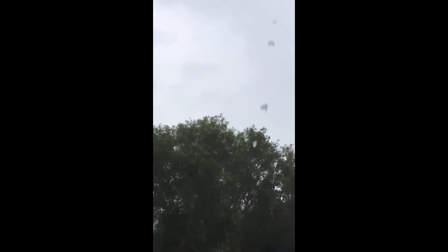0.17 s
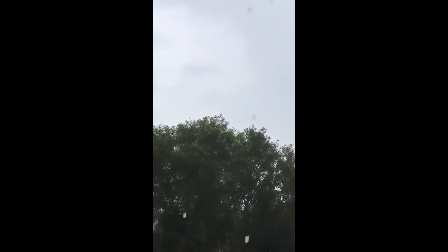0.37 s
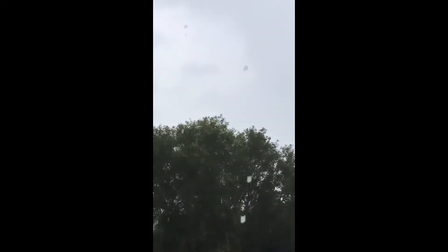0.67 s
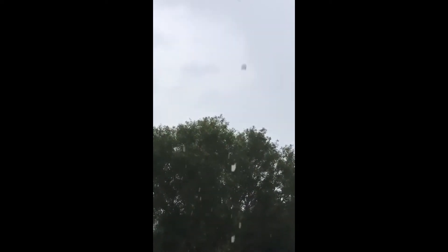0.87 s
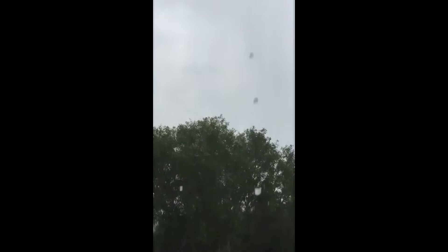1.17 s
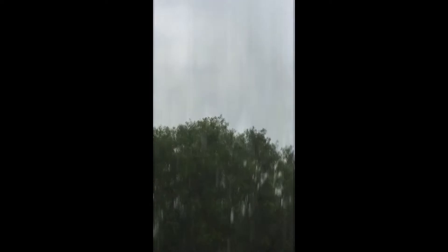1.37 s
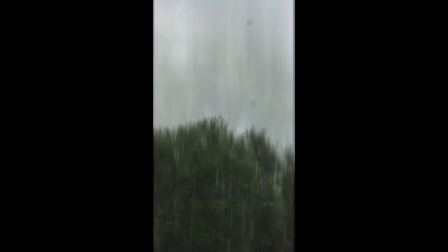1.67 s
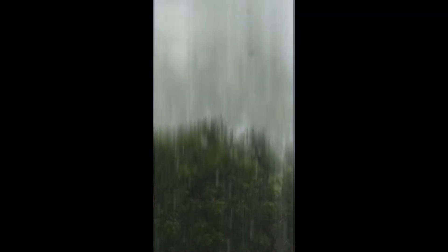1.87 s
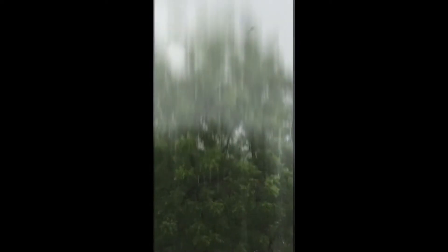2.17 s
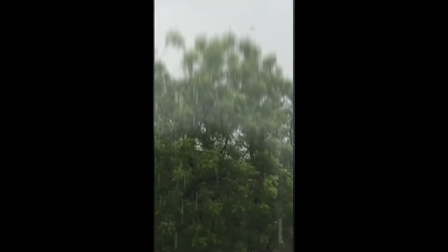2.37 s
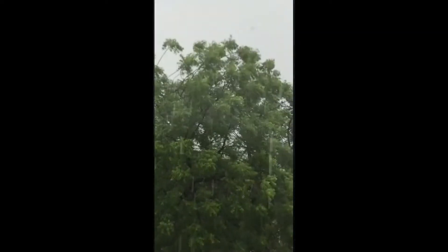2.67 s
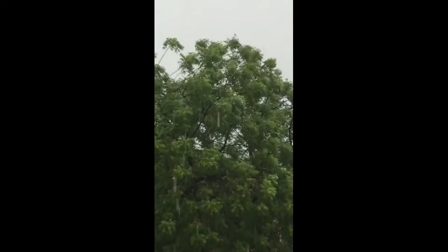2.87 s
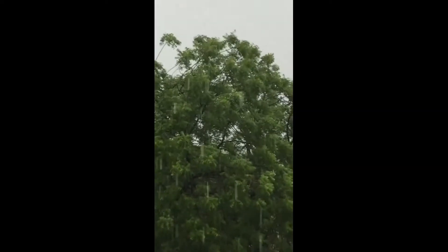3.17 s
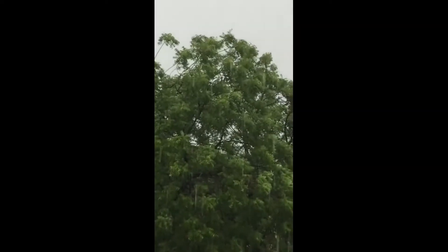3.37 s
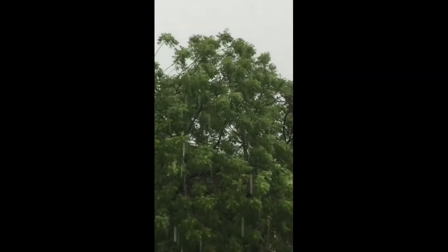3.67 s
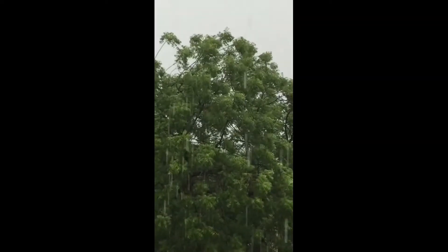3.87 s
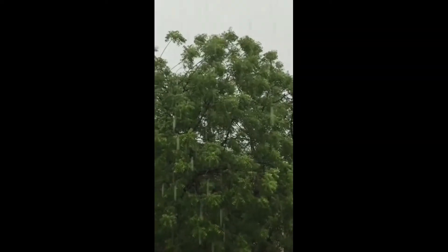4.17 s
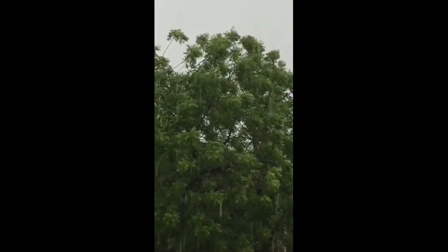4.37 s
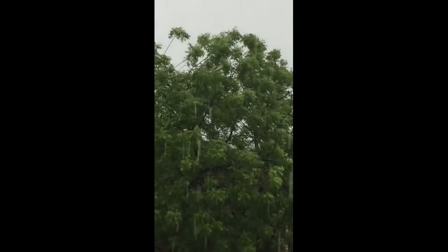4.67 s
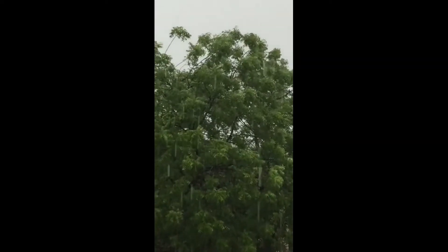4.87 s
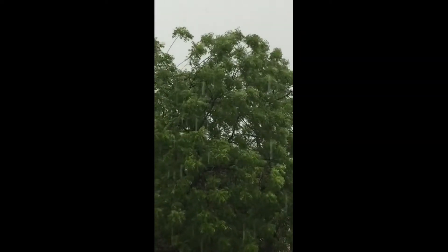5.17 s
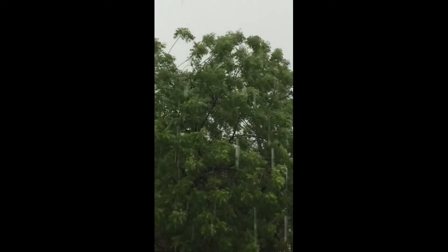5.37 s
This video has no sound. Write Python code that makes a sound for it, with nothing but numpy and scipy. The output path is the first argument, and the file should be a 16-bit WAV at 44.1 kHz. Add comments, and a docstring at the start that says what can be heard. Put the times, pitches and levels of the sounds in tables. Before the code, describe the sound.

Outdoors among trees, a dense hiss of heavy rain carries the patter of drops on leaves, small puddle plinks and a low drumming on a slack cover. It fades, cuts out completely for a split second, and builds again. From about halfway it stays louder and brighter, with large drops splatting irregularly right beside the microphone.

```python
"""Heavy rain on trees and ground.

Countless far drops merge into a wash, nearer ones patter on leaves, and big ones smack down close by,
each trailed by its spray. Drops ring a slack cover; bubbles plink in puddles. The sound sinks, drops
out for 0.3 s and swells back louder and brighter; now and then it dips for an instant. Mono."""
import sys
import numpy as np
from scipy import signal
from scipy.fft import rfft, irfft, next_fast_len
from scipy.io import wavfile
from scipy.ndimage import uniform_filter1d

SR = 44100
rng = np.random.default_rng(int(sys.argv[2]) if len(sys.argv) > 2 else 0)


def unload_audio(sound):
    """Save the sound as a 16-bit wav file, at the path given as the first command line argument."""
    columns = np.transpose(np.atleast_2d(sound))
    # keep every value between -1 and 1, then stretch to whole-number steps
    steps = np.round(np.clip(columns, -1, 1) * 32767)
    wavfile.write(sys.argv[1], SR, steps.astype(np.int16))


N = 243873
TIME = np.arange(N) / SR
TOP_HZ = 15750


def wash(flow_db, drum_db, splash_db, hiss_db, flicker_db, splash_follows):
    """Far rain: drumming, splashing on wet ground and hiss from leaves, each flickering on its own."""
    # band spectra: f/Hz, relative density/dB
    drumming = [(15, -44.5), (30, -52.5), (64, -35.5), (115, -17), (170, -6), (230, -4.5), (270, -5),
                (315, -6.5), (410, -5.5), (500, -9), (610, -9), (850, -22.5), (2000, -35.5)]
    splashing = [(200, -39.5), (480, -16.5), (600, -7), (740, -5.5), (880, -8.5), (1120, -4.5), (1480, -5),
                 (1950, -6), (2500, -9), (3500, -10), (9000, -53)]
    hiss = [(500, -51), (1500, -15.5), (2400, 1), (3200, 1), (4300, 3.5), (5400, 4), (6700, 3.5),
            (7500, 0.5), (8600, 0.5), (12000, -5), (15500, -4.5)]
    out = np.zeros(N)
    for spectrum, level_db, wobble_db in (
            (drumming, drum_db + flow_db, 0.47 * walk(24)),
            (splashing, splash_db + splash_follows * flow_db, 0.45 * walk(25.05)),
            (hiss, hiss_db + flow_db, flicker_db * walk(40))):
        out += unit(colour(rng.standard_normal(N), spectrum)) * undb(level_db + wobble_db)
    return out


def close_drops():
    """Big drops land close by, each with a sizzle of spray."""
    # drops: t/s, smack level over 1 ms/dB, f/Hz, half-width/oct, spray re smack/dB, smack length/s
    drops = [(0.0236, -24.5, 8400, 1.1, 4, 0.0003), (0.1378, -28, 3640, 0.39, 1, 0.0003),
             (0.3312, -24.5, 8680, 1.1, 1, 0.0004), (0.4127, -27, 4600, 0.26, -2, 0.00064),
             (0.4863, -22.5, 4200, 1.3, 6.5, 0.00037), (0.585, -31, 5530, 1.1, 9.5, 0.00034),
             (0.6409, -31, 4200, 0.8, -9, 0.0003), (0.666, -20.5, 5600, 0.79, 1, 0.00075),
             (0.7355, -25.5, 4520, 0.77, 1.0, 0.0003), (0.7684, -28.0, 6490, 0.64, 4, 0.00027),
             (0.8, -32.5, 9560, 0.32, 10, 0.0003), (1.0101, -29, 4220, 0.52, 7, 0.0003),
             (1.183, -29.5, 4520, 0.67, 6, 0.0003), (1.205, -28.5, 5200, 0.94, 9, 0.0003),
             (1.3342, -30.5, 8100, 1.0, 9, 0.0003), (1.452, -29, 1890, 0.39, 4, 0.001),
             (1.752, -32, 5850, 0.98, -4, 0.0003), (2.1466, -33, 4450, 1.0, 6.5, 0.00027),
             (2.1695, -31, 4930, 1.0, 7.5, 0.00027), (2.371, -32, 1380, 0.52, 10, 0.001),
             (2.418, -35, 12000, 0.35, 6, 0.0003), (2.6171, -28.5, 12000, 1.5, 9, 0.0003),
             (2.6542, -27, 12000, 1.1, 6.0, 0.0004), (2.684, -28, 3570, 1.0, -10, 0.00043),
             (2.7856, -18, 5500, 0.52, -3, 0.0003), (2.836, -22.5, 4250, 1.0, 3.5, 0.00023),
             (2.9067, -11.5, 11300, 1.2, -3.5, 0.00039), (2.9635, -17, 7900, 0.36, -3, 0.00037),
             (2.9957, -11.5, 5250, 0.73, -1, 0.00011), (3.0667, -14.5, 7100, 0.77, -3, 0.00032),
             (3.1357, -16.5, 11000, 1.9, 1, 0.00055), (3.2095, -21.5, 5530, 0.65, -4, 0.0002),
             (3.3008, -27, 11830, 1.0, -3, 0.00034), (3.4, -25, 3850, 0.67, 7.5, 0.00024),
             (3.4538, -17.5, 3730, 0.83, 1, 0.00094), (3.4766, -18.5, 3900, 0.37, -1, 0.00086),
             (3.5219, -23, 5650, 0.48, -2.5, 0.0003), (3.5943, -25.5, 8300, 1.3, 3.5, 0.00033),
             (3.6467, -23, 12000, 1.1, -4, 0.00037), (3.6997, -22, 4650, 0.6, 5, 0.00044),
             (3.7554, -16, 7260, 1.1, -0.5, 0.00023), (3.8455, -23.0, 4250, 1.1, 4, 0.00043),
             (3.8671, -15, 4250, 0.59, -9, 0.00072), (3.8768, -34, 12000, 1.0, 8, 0.0003),
             (3.8979, -23, 10470, 1.0, -3.5, 0.0003), (3.9092, -17.5, 4600, 0.81, 1, 0.0005),
             (3.9734, -27, 8470, 0.54, -10, 0.0003), (4.0885, -21.5, 6300, 0.83, 2, 0.00022),
             (4.1364, -24, 6240, 0.91, 1, 0.00024), (4.1519, -22.5, 3560, 1.0, 1, 0.0003),
             (4.1719, -21, 5300, 0.5, 2, 0.0004), (4.1964, -24.5, 8240, 0.8, 5, 0.00023),
             (4.4196, -20, 12000, 1.1, 0, 0.00027), (4.4705, -27, 6370, 0.9, 10, 0.0003),
             (4.5286, -21, 12000, 0.83, -4.5, 0.0003), (4.5527, -23, 6740, 0.64, -6.0, 0.0003),
             (4.6358, -18.5, 5050, 0.7, -2, 0.00027), (4.6653, -20.5, 7990, 0.61, 3, 0.0003),
             (4.683, -31.5, 4620, 0.42, 13.5, 0.00027), (4.7333, -19.5, 3430, 0.58, 5.5, 0.00064),
             (4.8485, -27, 10380, 0.35, 4, 0.00027), (4.8667, -16, 4100, 0.48, -2, 0.0005),
             (4.8873, -28, 12000, 0.5, 3.0, 0.0003), (4.9727, -29, 5550, 0.62, -4, 0.0003),
             (4.9928, -18, 4690, 0.63, -9, 0.00044), (4.9978, -16, 5690, 1, 0, 0.00024),
             (5.0483, -30, 3260, 0.8, -6.5, 0.00042), (5.0812, -22, 4710, 0.37, -5.0, 0.0004),
             (5.1042, -24.0, 6040, 0.57, -6, 0.00026), (5.1413, -32, 9430, 0.33, 10, 0.0003),
             (5.2004, -12, 10900, 1, 1.5, 0.00043), (5.2489, -12.5, 10190, 0.82, -7, 0.00023),
             (5.2908, -20.5, 5200, 0.37, 1, 0.0003), (5.3998, -10.5, 5600, 0.49, -3, 0.00048),
             (5.4099, -12.5, 4640, 0.69, -3, 0.00027), (5.416, -28, 13000, 0.29, 12, 0.00016),
             (5.502, -15, 3630, 0.53, 2.5, 0.00046)]
    return impacts(drops, spray_rise_s=0.0006, spray_decay_s=0.021, grain=0.66)


def patter(flow_db, near_db, centre_hz, spray_db, longest_s, count):
    """Drops hit leaves evenly over a ring around the listener: many far and faint, few near and strong."""
    moment, place, pitch, width, softness = rng.random((count, 5)).T
    t_s = moment * N / SR
    distance_ratio = np.sqrt(1 + 20 * place)
    level_db = np.interp(t_s, TIME, flow_db) + near_db - 20 * np.log10(distance_ratio)
    hz = centre_hz * 2 ** (2.1 * (pitch - .5))
    width_oct = 0.11 + 0.45 * width
    drops = np.column_stack([t_s, level_db, hz, width_oct, np.full(count, spray_db), longest_s * softness])
    return impacts(drops, spray_rise_s=0.001, spray_decay_s=0.025, grain=0.83)


def impacts(drops, spray_rise_s, spray_decay_s, grain):
    """Each drop smacks and flattens in a crackle; its droplets then land in a grainy sizzle."""
    size, lead = 4096, 128  # samples
    t_s, level_db, hz, width_oct, spray_db, length_s = np.asarray(drops, float).T[:, :, None]
    f = np.maximum(np.fft.rfftfreq(size, 1 / SR), 1)
    band = np.exp(-.5 * (np.abs(np.log2(f / hz)) / width_oct) ** 1.83)
    age_s = (np.arange(size) - lead) / SR
    noise, roughness = rng.standard_normal((len(t_s), 2, size)).swapaxes(0, 1)
    # as the drop spreads, the smack slides down its band
    power = band ** 2
    delay_s = length_s * (.5 - np.cumsum(power, axis=1) / power.sum(axis=1, keepdims=True))
    phase_turns = noise[:, :1] - np.cumsum(delay_s, axis=1) * SR / size
    smack = np.roll(irfft(band * np.exp(2j * np.pi * phase_turns)), lead, axis=1)
    flight_s = 0.0014 + 7.7 / hz  # big, low drops throw droplets higher
    landing = np.clip((age_s - flight_s) / spray_rise_s, 0, 1) * np.exp(-age_s / spray_decay_s)
    splat = undb(5) * (age_s >= 0) * np.exp(-np.abs(age_s) / 0.00081)
    taper = 1 - (age_s / age_s[-1]) ** 2
    sizzle = (landing + splat) * taper * noise * np.exp(grain * roughness)
    spray = irfft(band ** 1.9 * rfft(sizzle))  # narrower band than the smack
    for part in (smack, spray):  # scale to the energy of 1 ms at rms 1
        part /= np.sqrt((part ** 2).sum(axis=1, keepdims=True) / (SR / 1000))
    sounds = undb(level_db) * (smack + undb(spray_db) * spray)
    out = np.zeros(N + 2 * size)
    for start, sound in zip((t_s[:, 0] * SR).astype(int), sounds):
        out[start:start + size] += sound
    return out[lead:lead + N]


def fine_spray(flow_db, level_db, flicker_db):
    """Mist-sized drops make a thin, high hiss."""
    # mist spectrum: f/Hz, relative density/dB
    spectrum = [(3000, -28), (6500, -16), (9000, -5), (12500, 2.5), (15500, 2)]
    mist = unit(colour(rng.standard_normal(N), spectrum))
    return mist * undb(flow_db + level_db + flicker_db * walk(36))


def puddles(flow_db, level_db, centre_hz, spread_oct, t60_cycles, range_db, count):
    """Drops in standing water trap bubbles, each a brief plink of its own pitch."""
    moment, strength, pitch = rng.random((count, 3)).T
    offset_oct = -spread_oct * np.log(-np.log(pitch))  # long tail of small, high bubbles
    hz = np.minimum(centre_hz * 2 ** offset_oct, TOP_HZ)
    notes = np.column_stack([moment * N / SR, range_db * strength ** 2, hz, t60_cycles / hz])
    return unit(rings(notes, attack_s=0.00024)) * undb(flow_db + level_db)


def cover(flow_db, level_db, spread_db, detune, count):
    """Drops strike a slack cover at random places, each ringing its modes in a new mix and tuning."""
    # cover modes: f/Hz, t60/s, relative level/dB
    modes = [(197.8, 0.39, -4.5), (239.6, 0.22, -2.5), (311.8, 0.4, 0.5), (395, 0.051, -1),
             (587, 0.16, -10.5)]
    t_s = rng.random(count) * N / SR
    scatter = rng.standard_normal((count, len(modes), 2))
    out = np.zeros(N)
    for k, (hz, t60_s, db) in enumerate(modes):
        strength, tuning = scatter[:, k].T
        tuned_hz = hz * np.exp(detune * tuning)
        notes = np.column_stack([t_s, spread_db * strength, tuned_hz, np.full(count, t60_s)])
        out += undb(db) * unit(rings(notes, attack_s=.002))
    return unit(hollow_band(out)) * undb(flow_db + level_db)


def low_swells(t60_s):
    """The low drumming swells briefly into soft, hollow notes."""
    # swells: t/s, level/dB, f/Hz
    swells = [(0.513, -34, 215), (2.329, -30, 365), (2.699, -28.5, 346), (2.768, -31.5, 256),
              (2.888, -24, 316), (3.052, -28, 285), (3.231, -27, 294), (3.949, -28.5, 304.7),
              (4.531, -30, 209), (4.85, -27, 338), (5.221, -24.5, 249), (5.308, -29, 394)]
    return hollow_band(rings([(t_s, db, hz, t60_s) for t_s, db, hz in swells], attack_s=0.0095))


def bumps(hz, decay_s):
    """Soft, dull thuds: fast-decaying low sines."""
    # thuds: t/s, level/dB
    thuds = [(2.998, -45), (3.107, -51)]
    out = np.zeros(N)
    for t_s, db in thuds:
        age_s = np.maximum(TIME - t_s, 0)
        out += undb(db) * np.sin(2 * np.pi * hz * age_s) * np.exp(-age_s / decay_s)
    return out


def dips(x, depth_db, half_length_s, above_hz):
    """The treble dips briefly; the bass carries on."""
    # dip centres: t/s
    centres_s = [.962, 1.497, 2.241, 2.707, 3.354, 3.678, 3.727, 3.796, 4.121, 4.285, 4.329, 5.023, 5.329]
    bass = signal.sosfiltfilt(signal.butter(1, above_hz, fs=SR, output="sos"), x)
    dip = sum(np.exp(-((TIME - t_s) / half_length_s) ** 2) for t_s in centres_s)
    return bass + (x - bass) * undb(depth_db * dip)


def rings(notes, attack_s):
    """Damped sines from rows of t/s, level/dB, f/Hz, t60/s."""
    out = np.zeros(N + SR)
    for t_s, db, hz, t60_s in notes:
        age_s = np.arange(int(min(t60_s, 1) * SR)) / SR
        start = int(t_s * SR)
        envelope = (1 - np.exp(-age_s / attack_s)) * np.exp(-np.log(1000) * age_s / t60_s)
        out[start:start + len(age_s)] += undb(db) * envelope * np.sin(2 * np.pi * hz * age_s)
    return out[:N]


def walk(rate_hz):
    """Ramps between random values, rms 1."""
    hold = int(SR / rate_hz)
    steps = rng.uniform(-1, 1, 1000)
    return unit(uniform_filter1d(steps[np.arange(N) // hold % len(steps)], hold))


def colour(x, points):
    """Filter by rows of f/Hz, gain/dB."""
    hz, db = np.transpose(sorted(points))
    size = 2 * next_fast_len(N)
    f = np.maximum(np.fft.rfftfreq(size, 1 / SR), 1)
    gain = undb(np.interp(np.log(f), np.log(hz), db))
    return irfft(rfft(x, size) * gain)[:N]


def hollow_band(x):
    """Band-pass: little deep bass, little treble."""
    return signal.sosfilt(signal.butter(2, [140, 900], "bandpass", fs=SR, output="sos"), x)


def lowpass(x, hz):
    """Steep zero-phase low-pass."""
    return signal.sosfiltfilt(signal.ellip(8, .05, 50, hz, fs=SR, output="sos"), x)


def undb(db):
    """Decibels to gain."""
    return 10 ** (np.asarray(db) / 20)


def unit(x):
    """Scale to rms 1."""
    return x / np.sqrt(np.mean(x ** 2))


def scene():
    """Rain sinks; the sound drops out for a moment, then the scene changes to rain that swells louder."""
    sink_from_s, gap_from_s, gap_to_s, swell_until_s = 0.99, 1.782, 2.073, 2.94
    sink_db_per_s, swell_db_per_s, settle_db_per_s, cover_db_per_s = -6, 6.5, -0.14, 1.3
    # treble with a narrow notch after the gap: f/Hz, gain/dB
    late_treble = [(8000, 0), (9400, .5), (9650, -3), (10300, -1.5), (11500, 1), (13500, .5), (16000, 0)]
    sink_db = sink_db_per_s * np.maximum(TIME - sink_from_s, 0)
    past_crest_s = TIME - swell_until_s
    swell_db = np.where(past_crest_s < 0, swell_db_per_s, settle_db_per_s) * past_crest_s
    cover_db = swell_db + cover_db_per_s * past_crest_s  # the cover keeps growing louder
    close = close_drops()

    early = wash(sink_db, drum_db=-43, splash_db=-38, hiss_db=-34.5, flicker_db=0.87, splash_follows=1.03)
    early += fine_spray(sink_db, level_db=-39, flicker_db=5.5)
    early += cover(sink_db, level_db=-48, spread_db=4, detune=0.1202, count=250)
    early += puddles(sink_db, level_db=-49, centre_hz=1780, spread_oct=.7, t60_cycles=180,
                     range_db=6.5, count=700)
    early += patter(sink_db, near_db=-27.5, centre_hz=5300, spray_db=-1.5, longest_s=0.00071, count=800)
    early = lowpass(early + close, hz=12350)

    late = wash(swell_db, drum_db=-38, splash_db=-34.5, hiss_db=-33, flicker_db=1.86, splash_follows=.7)
    late += cover(cover_db, level_db=-44, spread_db=5, detune=0.0913, count=200)
    late += low_swells(t60_s=0.18)
    late += puddles(swell_db, level_db=-40.5, centre_hz=1614, spread_oct=0.502, t60_cycles=300,
                    range_db=5.5, count=700)
    late += patter(swell_db, near_db=-28.5, centre_hz=5200, spray_db=4, longest_s=0.00084, count=850)
    late += bumps(hz=74.4, decay_s=0.026)
    late = colour(late + close, late_treble)

    fade_out = np.clip((gap_from_s - TIME) / .006, 0, 1)
    fade_in = np.clip((TIME - gap_to_s) / .018, 0, 1)
    rain = dips(early * fade_out + late * fade_in, depth_db=-10, half_length_s=.0075, above_hz=900)
    return np.tile(rain, (2, 1))


def record(dry):
    """Clip at full scale and cut the top."""
    return lowpass(np.clip(dry, -1, 1), TOP_HZ)


dry = scene()
out = record(dry)
unload_audio(out)
```